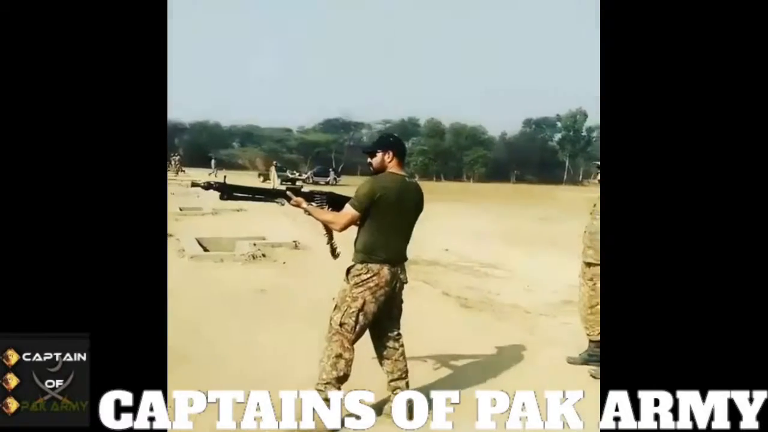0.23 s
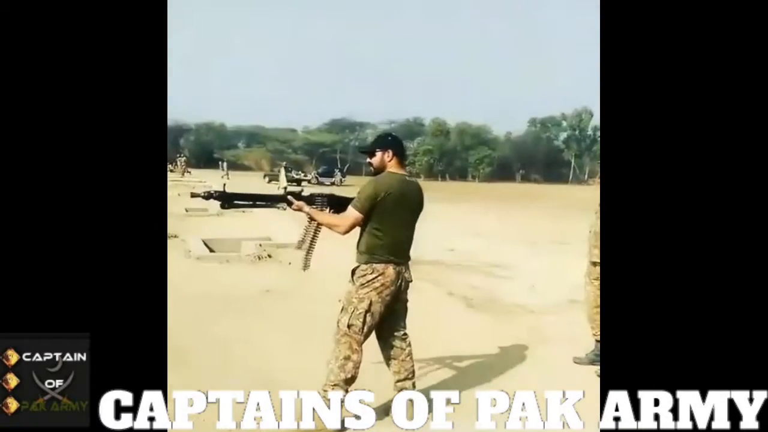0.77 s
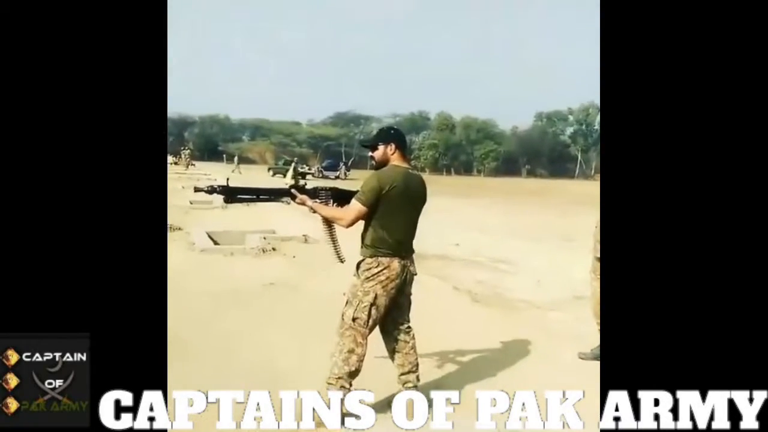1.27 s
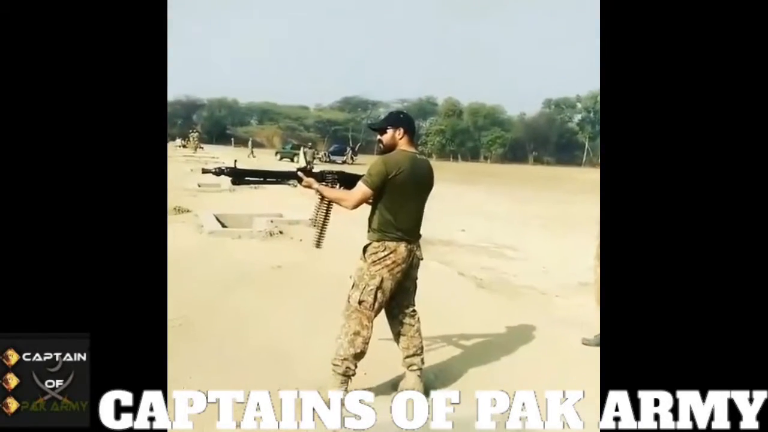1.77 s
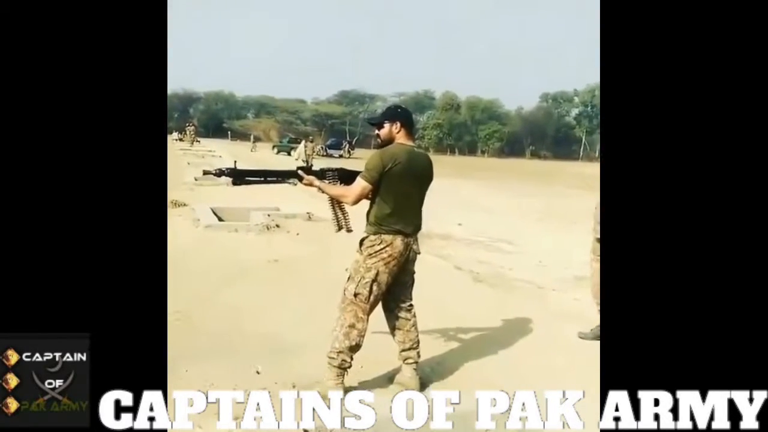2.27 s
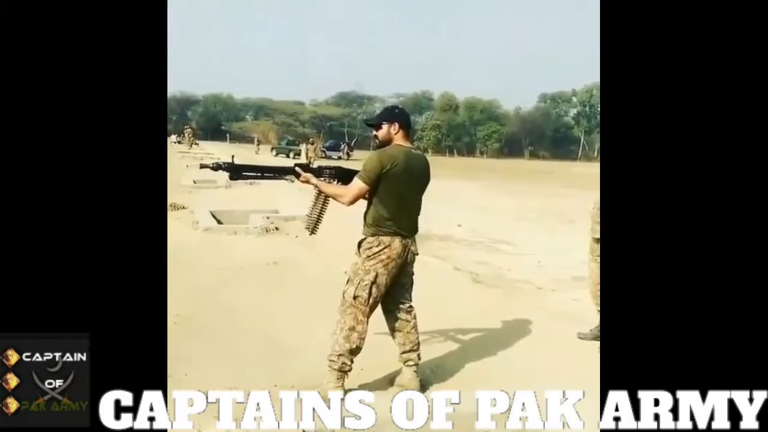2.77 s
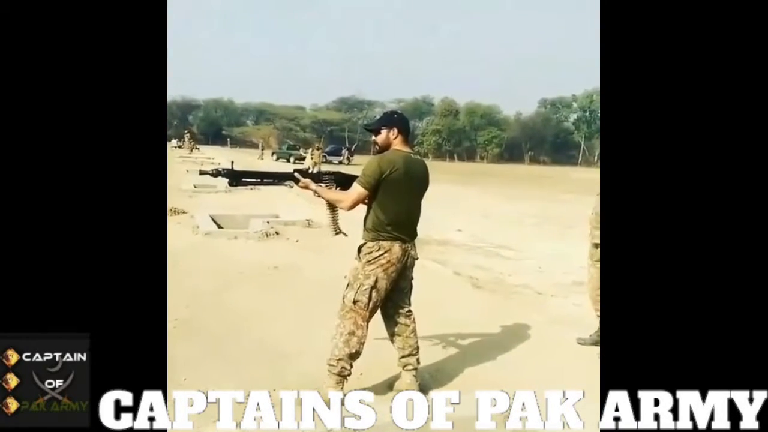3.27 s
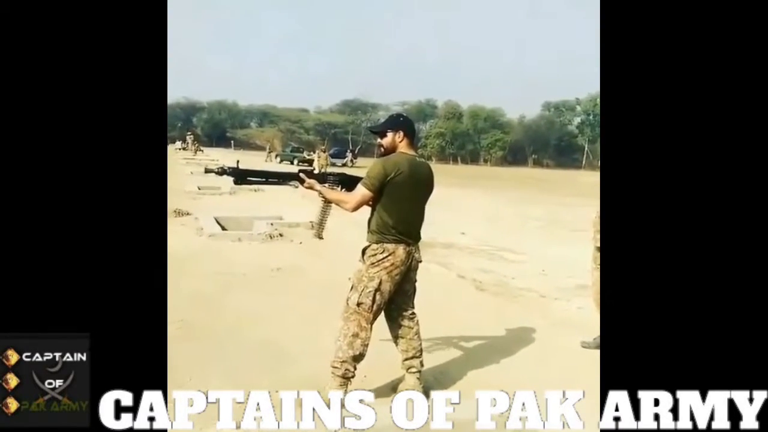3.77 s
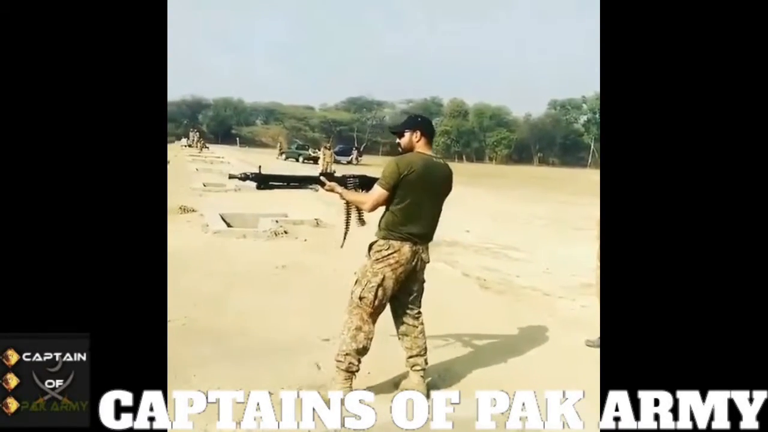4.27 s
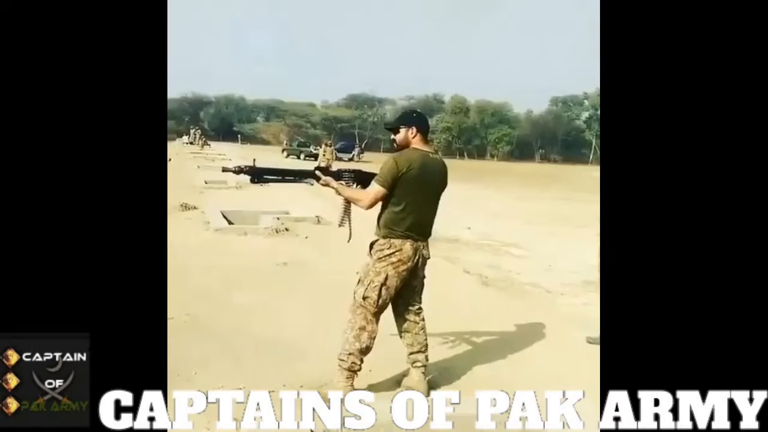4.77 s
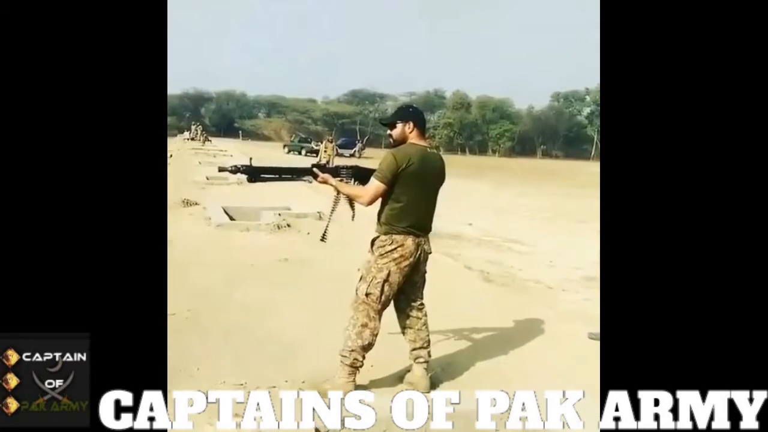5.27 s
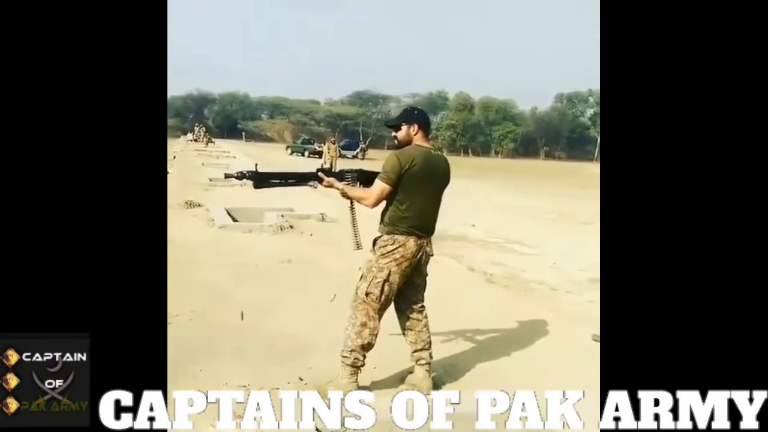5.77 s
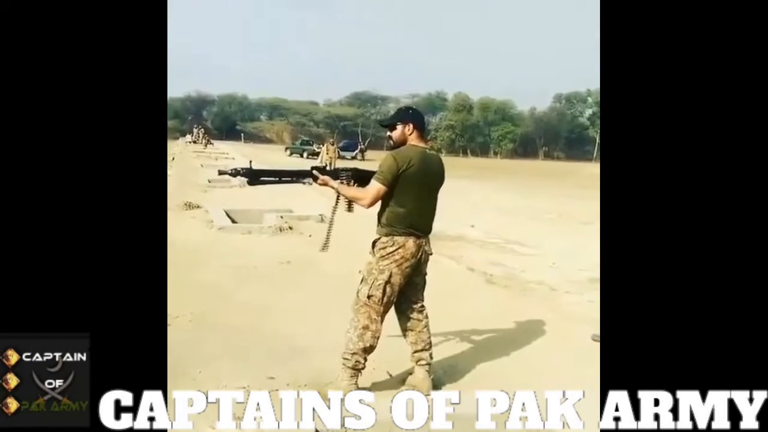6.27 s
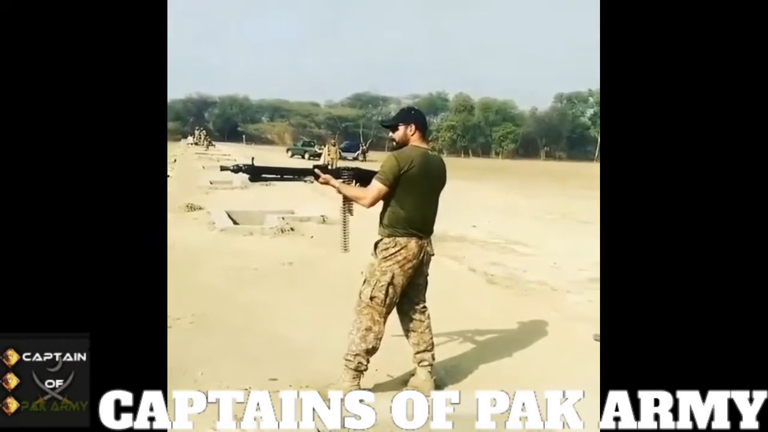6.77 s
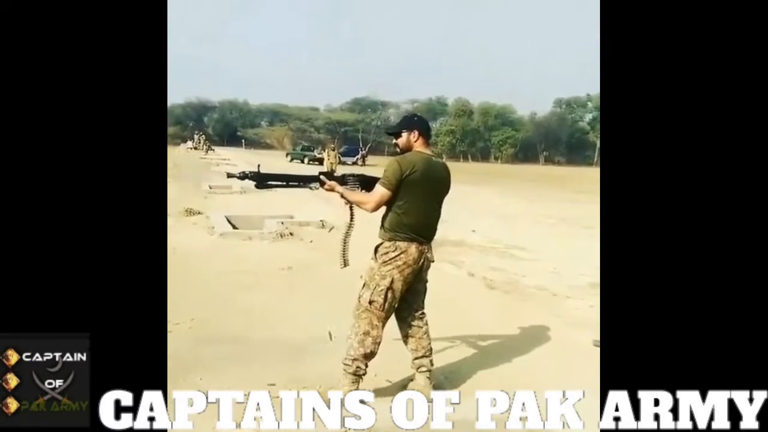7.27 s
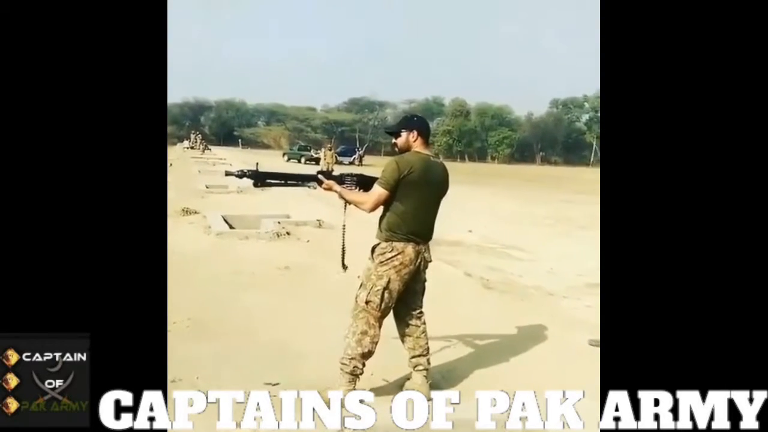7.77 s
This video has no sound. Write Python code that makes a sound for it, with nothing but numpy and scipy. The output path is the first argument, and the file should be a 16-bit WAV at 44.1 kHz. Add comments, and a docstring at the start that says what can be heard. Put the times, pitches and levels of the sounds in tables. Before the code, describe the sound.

A belt-fed machine gun fires five short bursts of three or four rounds, about two seconds apart, on an open range. Each burst is a ragged roar with a steel rattle, close enough to overload the microphone. Cases and links clink, and the shots roll back from the land with deep thuds. A few dull thumps sound far away over a faint low breeze.

```python
"""A belt-fed machine gun fires close bursts of three or four rounds on an open range.
Each shot is a ragged roar of gas; the bolt rattles forward before a burst, steel rings and cases clink
after it. Ground and trees roll the shots back, and an earth bank returns each as a deep thud.
Far off, a dove coos in the breeze and dull thumps roll in. The blasts overload the microphone,
and a limiter ducks after every loud peak."""
import sys
import numpy as np
from scipy import signal
from scipy.fft import rfft, irfft, next_fast_len
from scipy.io import wavfile
from scipy.ndimage import uniform_filter1d, minimum_filter1d, map_coordinates

SR = 44100
rng = np.random.default_rng(int(sys.argv[2]) if len(sys.argv) > 2 else 0)


def persist_wave(psi):
    """Save psi, clipped to +-1, as 16-bit WAV."""
    counts = np.round(np.clip(psi, -1, 1) * 32767).astype(np.int16)
    wavfile.write(sys.argv[1], SR, np.atleast_2d(counts).T)


N = 354123

# Rounds fired. Each row: time in seconds, relative blast level in dB, tilt of the round's own
# share of the roar in dB per octave, tree echo trim in dB.
SHOTS = [(-.1445, -10.5, -2, 4.5), (-.0928, -10, -13, 4), (-.0429, -16, -18, 1.5), (1.9940, -21, 0.5, 2.5),
         (2.0459, -9, 0.5, 1.5), (2.0985, -8.5, 0, 2), (4.0812, -20, -0.5, -0.5), (4.133, -8, 0, -0.5),
         (4.1817, -8.5, -0.5, 3.5), (4.2280, -8.5, -0.5, 4), (5.674, -10, 0, 0.5), (5.7283, -8.5, -1.5, 3),
         (5.7787, -7.5, 0, 2.5), (7.2326, -8, 0.5, 3), (7.2852, -8.5, -1, 0.5), (7.3354, -8.5, -1, 2),
         (7.384, -8.5, -1, 3.5)]
# Tone of the gun: muzzle gas, low boom, buffer knock, scraped or struck steel, sharp snap.
# Each row: frequency in Hz, relative level in dB.
BLAST_EQ = [(24, -29), (40, -4.5), (126, -8.5), (282, 4.5), (387, -4), (470, -0.5), (558, -6.5),
            (804, -4.5), (1630, -9), (1980, -5), (3830, -9), (4330, -11), (7200, -15), (8400, -22),
            (9200, -17), (10700, -19.5), (12400, -29), (13600, -61.5)]
BOOM_EQ = [(40, -20.5), (130, -3.5), (290, 2.5), (450, -2.5), (800, -23.5), (3000, -60)]
BUFFER_EQ = [(100, -21), (400, 0), (900, 3), (2200, -7), (3500, -13.5), (8000, -26), (13000, -49)]
STEEL_EQ = [(200, -27.5), (800, 6.5), (1500, -1.5), (3500, 5.5), (7000, -1), (11000, -1), (12800, -27),
            (14000, -58)]
SNAP_EQ = [(200, -6), (1000, -3), (2500, -1), (4500, -8), (7000, -12), (13000, -59)]
# Modes of the rattling gun body, and the barrel's beating pair.
# Each row: pitch in Hz, relative level in dB, 60 dB decay time (t60) in seconds.
BODY_MODES = [(446, -12, .08), (823, -8, .075), (1429, -17, 0.11), (1900, -12.5, 0.095), (2560, -19, 0.13),
              (3730, -19, .12), (3880, -16.5, 0.066), (4700, -18.5, 0.081), (5220, -21, 0.11),
              (5560, -21.5, .08), (6900, -24, .08)]
BARREL_MODES = [(7832, 3.5, 0.68), (7782, -6.5, 0.6)]
# The barrel's ring. Each entry: trim for one burst in dB.
BARREL_TRIMS_DB = [-31.5, -27, -21.5, -24, -24]
# Hard catches along the bolt's travel. Each row: seconds after release, relative level in dB.
BOLT_CATCHES = [(.003, -3), (.0135, 4), (.033, -1), (.043, 0.5), (0.056, 7.5)]
# Cases and links striking. Each row: start in seconds, relative level in dB, centre pitch in Hz,
# t60 in seconds.
CLINKS = [(.012, -25, 5030, 0.063), (.0325, -16.5, 4100, 0.035), (.110, -29, 6030, 0.077),
          (.321, -29.5, 6020, 0.19), (0.355, -24.5, 5760, 0.1), (.408, -27, 5640, 0.045),
          (1.583, -33, 4940, 0.0099), (2.311, -22, 4800, 0.022), (2.486, -28, 6200, 0.1),
          (2.535, -36, 6300, .08), (4.394, -23, 4600, .04), (4.450, -12.5, 5470, 0.032),
          (4.5775, -19, 2920, .03), (4.6322, -13.5, 5700, 0.038), (4.674, -22, 5700, 0.059),
          (5.088, -40, 5570, 0.026), (5.228, -47, 5370, 0.036), (5.856, -31, 7300, 0.062),
          (6.272, -32, 6800, 0.026), (7.460, -14.5, 2650, 0.016), (7.502, -27, 4870, 0.11),
          (7.732, -22, 6200, 0.043), (7.785, -31, 5630, 0.044), (7.827, -24, 5510, 0.0416)]
# One case left singing. Each row: start in seconds, level in dB, pitch in Hz, t60 in seconds.
BRASS_MODES = [(4.633, -42, 10760, 0.33), (4.633, -45, 10430, 0.43), (4.633, -41, 6315, 0.4)]
# Close snaps. Each row: start in seconds, then spike, rattle and thud levels in dB.
SNAPS = [(0.0554, 11.5, -3, -4), (4.5801, 3.5, -12, -28)]
# Open ground, belts of trees and rises in the land that scatter a shot back.
# Each row: round trip in seconds, relative level in dB, t60 in seconds.
FLATS = [(.1, -26, 0.23), (.3, -24.5, 1.2), (.55, -34.5, 1.15)]
WOODS = [(.19, -39.5, 1.1), (.51, -30, 1.9), (1.3, -49.5, 1.9)]
RIDGES = [(.32, -31, 4.9), (.68, -26, 1.19), (1.2, -45, 2.7)]
# Low mounds. Each row: round trip in seconds, relative level in dB.
MOUNDS = [(.170, -18), (.214, -19.5), (.274, -19), (0.3233, -10), (.357, -21), (.384, -24.5), (.445, -22),
          (.705, -17.5)]
# Tone of the echoes: ground, trees, ridges, hollow hum, mounds, the bank's thud and its splash.
# Each row: frequency in Hz, relative level in dB.
GROUND_EQ = [(40, -31), (120, -11), (200, 0.5), (300, -1), (430, -2), (600, -4.5), (850, -7), (1300, -11.5),
             (2500, -20), (4000, -25), (7000, -43), (10000, -57.5), (13000, -78.5)]
TREES_EQ = [(300, -20), (700, -11.5), (1300, -5), (1600, -1.5), (1950, 3.5), (2330, 0), (2700, -5.5),
            (3100, -5.5), (3600, -8.5), (4700, -17.5), (5900, -20.5), (7500, -27), (9500, -36),
            (11500, -51.5), (14000, -79.5)]
RIDGE_EQ = [(25, -26), (60, -13.5), (120, -3), (190, -1.5), (330, -0.5), (420, -10), (600, -21),
            (1200, -34.5), (4000, -74.5)]
HOLLOW_EQ = [(100, -34), (165, -22), (200, -6), (236, -21), (275, -12.5), (297, 4), (318, -10), (348, -10),
             (380, -22), (900, -44.5), (3000, -79.5)]
MOUND_EQ = [(50, -24.5), (150, -5), (320, 3.5), (600, -6), (900, -11.5), (1400, -14), (2200, -13),
            (4000, -30), (8000, -54), (13000, -80)]
BANK_EQ = [(30, -42.5), (70, -9), (130, -1), (210, 2), (300, -2.5), (450, -6.5), (560, -21.5), (680, -36),
           (950, -10.5), (1120, -28), (1400, -24), (2000, -30), (3200, -39), (6000, -61), (14000, -100)]
SPLASH_EQ = [(300, -15), (1000, -5), (2000, 1.5), (3000, -5), (4200, -17), (7000, -27.5), (11000, -39.5),
             (14000, -75)]
# The bank's treble splash. Each entry: level for one burst in dB.
SPLASH_LEVELS_DB = [-18, -19, -25, -18.5, -19]
# The slope's whoosh. Each row: distance from the band's centre in Hz, relative level in dB.
WHOOSH_BAND = [(1, 0), (35, -1), (65, -10), (120, -28), (400, -70)]
# Far thumps. Each row: start in seconds, peak in dB, low-mid tilt in dB per octave.
THUMPS = [(1.035, -22, -0.5), (1.124, -22, 3), (1.152, -20, 3), (1.183, -17.5, 0), (1.342, -27, 0),
          (1.728, -28, 0.5), (3.181, -18, -1.5), (3.193, -18, 0.5), (3.291, -17.5, -2.5),
          (3.625, -20.5, -4), (3.643, -20.5, -1), (3.671, -24.5, -4), (7.049, -14.5, 6), (7.082, -16, -2),
          (7.108, -22, 0)]
# The dove's call. Each row: start in seconds, length in seconds, level in dB, top pitch in Hz.
COOS = [(3.18, .11, -52, 690), (3.36, .17, -51, 725), (3.79, .13, -61.5, 705)]
# Swells and lulls of the breeze. Each row: centre in seconds, change in dB, half length in seconds.
GUSTS = [(1.01, 4.5, 0.19), (1.21, 7, .16), (1.517, -5, 0.1), (3.82, -2.5, .13), (3.3, 4.5, 0.3)]
# Tone of a dull thump, the breeze and the hiss. Each row: frequency in Hz, relative level in dB.
THUMP_EQ = [(30, -37), (70, -8.5), (130, 3.5), (250, -7), (500, -17.5), (900, -34.5), (2000, -80),
            (6000, -120)]
BREEZE_EQ = [(15, -41), (25, -23), (42, -6), (65, -1), (104, -1), (167, -3), (195, -4.5), (400, -22),
             (607, -29), (1300, -37.5), (2100, -37), (3000, -46.5), (4500, -58.5), (8000, -79)]
HISS_EQ = [(1000, 0), (4500, -0.5), (11300, -1.5), (13600, -12.5)]


def blasts(alike=0.32, hold_s=0.023, sag_db_per_s=151.5, collapse_t60=0.071, body_db=-1, drive_db=9.5):
    """Gas jets out, sags and collapses, shaking the gun's body; a boom and the bolt's knock follow."""
    out, t = np.zeros(N), clock(.2)
    common = noise(BLAST_EQ, len(t))  # same gun, same place: rounds are partly alike
    jet = amp(-sag_db_per_s * t) * decay(np.maximum(t - hold_s, 0), collapse_t60)
    wash = decay(t, 0.19, db=-7)  # a weak, duller return off the sand
    boom = amp(-8) * surge(t, peak_s=.011, rise_s=.04, t60=0.046)  # the gas ball swells and falls back
    recoil = amp(-9.5) * surge(t, peak_s=.035, rise_s=0.022, t60=0.043)  # the bolt hits its buffer
    for s, db, tilt_db, _ in SHOTS:
        roar = jet * blend(common, noise(BLAST_EQ, len(t), tilt_db), alike)
        roar += wash * noise(BLAST_EQ, len(t), tilt_db=-0.7)
        roar *= flutter(len(t), depth_db=2.5, rate=400)
        roar += boom * noise(BOOM_EQ, len(t))
        body = sum(decay(t, t60, level + rng.normal(0, 3.5)) * np.sin(2 * np.pi * (hz * t + rng.random()))
                   for hz, level, t60 in BODY_MODES)
        knock = recoil * noise(BUFFER_EQ, len(t))
        add(out, s, amp(db + drive_db) * attack(t, 0.00084) * (roar + amp(body_db) * body + knock))
    return out


def bolt(travel_s=.0645, level_db=-27, scrape_db=-11.5, grow_db_per_s=133, catch_t60=0.043):
    """Before each burst the bolt scrapes over hard catches, louder as it speeds up, and slams home."""
    out, t = np.zeros(N), clock(.11)
    slide = amp(scrape_db + grow_db_per_s * t) * (t < travel_s)
    slam = amp(8.5) * surge(t, peak_s=travel_s, rise_s=0.075, t60=0.11)
    stroke = amp(level_db) * np.maximum(slide, slam)
    for rounds in bursts():
        release = rounds[0] - travel_s
        add(out, release, stroke * flutter(len(t), depth_db=3, rate=320) * noise(STEEL_EQ, len(t)))
        for delay, db in BOLT_CATCHES:
            modes_hz = rng.uniform(2500, 8500, (14, 1))  # each catch rings other modes of the steel
            clack = unit(np.sin(2 * np.pi * modes_hz * t).sum(0))
            add(out, release + delay, decay(t, catch_t60, level_db + db) * attack(t, 0.00105) * clack)
    return out


def barrel_ring(delay_s=0.023, swell_s=0.16):
    """Two close, beating modes of the barrel sing out as each burst ends."""
    out, t = np.zeros(N), clock(.8)
    ring = sum(decay(t, t60, db) * np.sin(2 * np.pi * hz * t) for hz, db, t60 in BARREL_MODES)
    swell = 1 - np.exp(-(t / swell_s) ** 2)
    for rounds, db in zip(bursts(), BARREL_TRIMS_DB):
        add(out, rounds[-1] + delay_s, amp(db) * swell * flutter(len(t), depth_db=3, rate=55) * ring)
    return out


def cases(ring_db=-7, crack_db=-9, crack_t60=0.029, pitch_spread=.11):
    """Cases and belt links strike with a crack and a cluster of short modes; one case sings on."""
    out, t = np.zeros(N), clock(.35)
    for s, db, hz, t60 in CLINKS:
        modes_hz = hz * np.exp(pitch_spread * rng.standard_normal((12, 1)))
        partials = np.sin(2 * np.pi * (modes_hz * t + rng.random((12, 1))))
        ring = decay(t, t60, ring_db) * unit(partials.sum(0))
        crack = decay(t, crack_t60, crack_db) * noise(STEEL_EQ, len(t), tilt_db=-2)
        add(out, s, amp(db) * attack(t, 0.00053) * (ring + crack))
    for s, db, hz, t60 in BRASS_MODES:
        add(out, s, decay(t, t60, db) * np.sin(2 * np.pi * hz * t))
    return out


def snaps(rattle_t60=0.012):
    """Sharp snaps right up close: a hard spike with a small rattle and a thud under it."""
    out, t = np.zeros(N), clock(0.056)
    for s, spike_db, rattle_db, thud_db in SNAPS:
        add(out, s, amp(spike_db) * pulse(SNAP_EQ))
        add(out, s, decay(t, rattle_t60, rattle_db) * noise(SNAP_EQ, len(t)))
        add(out, s, -amp(thud_db) * pulse(THUMP_EQ))
    return out


def rolling_echo(absorb_db_per_khz_s=3.0, ground_alike=0.86):
    """Ground, trees and ridges scatter each shot back in lumps; the air takes treble along the way."""
    out, t = np.zeros(N), clock(2.2)
    pools = [noise(eq, N) for eq in (GROUND_EQ, TREES_EQ, RIDGE_EQ)]
    flats = echo_envelope(FLATS, t, rise_s=0.67)
    woods = echo_envelope(WOODS, t, rise_s=0.5)
    ridges = echo_envelope(RIDGES, t, rise_s=0.99)
    stones = rng.standard_normal(len(t)) * flutter(len(t), depth_db=3.5, rate=900)  # a few stand out
    terrain = unit(signal.fftconvolve(stones, pulse(GROUND_EQ))[:len(t)])
    hz, delay, _ = signal.stft(t, SR, nperseg=512)
    air = amp(-absorb_db_per_khz_s * np.outer(hz / 1000, delay - .5))  # bright before 0.5 s, dull after
    lumps = flutter(len(t), depth_db=2.5, rate=70)
    trunks = flutter(len(t), depth_db=3, rate=230)
    for s, _, _, trees_db in SHOTS:
        ground, trees, rumble = [pool[rng.integers(N - len(t)):][:len(t)] for pool in pools]
        ground = blend(terrain, ground, ground_alike)  # the ground repeats itself, moving leaves never do
        scatter = lumps * (flats * ground + ridges * rumble) + amp(trees_db) * trunks * woods * trees
        spectrum = signal.stft(scatter, nperseg=512)[2]
        add(out, s, signal.istft(spectrum * air, nperseg=512)[1])
    return out


def hollow_echo(level_db=-26.5):
    """The near ground hums one answer to all a burst's rounds, ringing at multiples of the firing rate."""
    out, t = np.zeros(N), clock(.8)
    swell = amp(level_db) * surge(t, peak_s=.2, rise_s=.55, t60=0.45)
    for rounds in bursts():
        answer = swell * noise(HOLLOW_EQ, len(t))
        for s in rounds:
            add(out, s, answer)
    return out


def slope_whoosh(level_db=-28.5, peak_s=.62, hz_at_peak=410, octaves_per_s=-1.9):
    """The long slope before the bank returns a narrow whoosh that sinks as it comes from farther off."""
    out, t = np.zeros(N), clock(1.3)
    centre_hz = hz_at_peak * 2 ** (octaves_per_s * (t - peak_s))
    phase = 2 * np.pi * np.cumsum(centre_hz) / SR
    swell = amp(level_db) * surge(t, peak_s, rise_s=.95, t60=.42)
    for s, *_ in SHOTS:
        band = noise(WHOOSH_BAND, len(t)) * np.sin(phase) + noise(WHOOSH_BAND, len(t)) * np.cos(phase)
        add(out, s, swell * band)
    return out


def mound_echoes(smear_t60=0.046, slap_db=1):
    """Low mounds each return a slap and a short smear, the same for every round."""
    out, t = np.zeros(N), clock(.1)
    slap = -amp(slap_db) * pulse(MOUND_EQ)
    for delay, db in MOUNDS:
        smear = decay(t, smear_t60) * attack(t, 0.0017) * noise(MOUND_EQ, len(t))
        for s, *_ in SHOTS:
            add(out, s + delay, amp(db) * slap)
            add(out, s + delay, amp(db) * smear)
    return out


def bank_echo(round_trip_s=.755, thud_db=0.7, second_lag_s=.0155, second_db=-15, splash_t60=0.046):
    """An earth bank 130 m off returns each round as a deep thud, with a weaker one just behind."""
    out, t = np.zeros(N), clock(.06)
    thud = -amp(thud_db) * pulse(BANK_EQ)
    for rounds, splash_db in zip(bursts(), SPLASH_LEVELS_DB):
        splash = decay(t, splash_t60, splash_db) * attack(t, 0.0024)  # its rough face smears the treble
        for s in rounds + round_trip_s:
            add(out, s, thud)
            add(out, s + second_lag_s, amp(second_db) * thud)
            add(out, s, splash * noise(SPLASH_EQ, len(t)))
    return out


def far_thumps(roll_db=-14, roll_t60=0.2):
    """Dull thumps from far away, each a low pulse with a short roll behind it."""
    out, t = np.zeros(N), clock(.3)
    for s, db, tilt_db in THUMPS:
        add(out, s, -amp(db) * pulse(THUMP_EQ, tilt_db=tilt_db))
        add(out, s, decay(t, roll_t60, db + roll_db) * attack(t, 0.0051) * noise(THUMP_EQ, len(t)))
    return out


def dove(pitch_sag=.1):
    """Three faint, pure coos, each arching in pitch."""
    out = np.zeros(N)
    for s, length, db, top_hz in COOS:
        arch = np.sin(np.pi * clock(length) / length)
        hz = top_hz * (1 - pitch_sag * (1 - arch))
        add(out, s, amp(db) * arch * np.sin(2 * np.pi * np.cumsum(hz) / SR))
    return out


def breeze(level_db=-38, hiss_db=-72.5, rustle_db=-51, rustle_s=1.2, rustle_half_s=.11):
    """A low, uneven breeze over a steady hiss; the strongest gust stirs the treetops."""
    t = np.arange(N) / SR
    strength_db = level_db + sum(db * np.exp(-((t - s) / half) ** 2) for s, db, half in GUSTS)
    wind = amp(strength_db) * flutter(N, depth_db=2.5, rate=7.2) * noise(BREEZE_EQ, N)
    hiss = amp(hiss_db) * noise(HISS_EQ, N)
    stir = amp(rustle_db) * np.exp(-((t - rustle_s) / rustle_half_s) ** 2)
    return wind + hiss + stir * noise(TREES_EQ, N, tilt_db=-5)


def bursts(pause_s=.5):
    """Times of the rounds, grouped into bursts at the pauses."""
    times = np.array([s for s, *_ in SHOTS])
    return np.split(times, np.flatnonzero(np.diff(times) > pause_s) + 1)


def amp(db):
    """Decibels to gain."""
    return 10 ** (np.asarray(db) / 20)


def unit(x):
    """Scale to rms 1."""
    return x / np.sqrt(np.mean(x ** 2) + 1e-20)


def clock(seconds):
    """Sample times of a stretch."""
    return np.arange(int(seconds * SR)) / SR


def attack(t, seconds):
    """A fade-in with this time constant."""
    return 1 - np.exp(-t / seconds)


def decay(t, t60, db=0):
    """A gain that starts at db and falls 60 dB every t60 seconds."""
    return amp(db - 60 * t / t60)


def surge(t, peak_s, rise_s, t60):
    """A gain that builds by 60 dB in rise_s, peaks at 1 and dies away."""
    return amp(-60 * np.maximum((peak_s - t) / rise_s, (t - peak_s) / t60))


def echo_envelope(places, t, rise_s):
    """Gain of the echo from several places, added in power."""
    return np.sqrt(sum((amp(db) * surge(t, s, rise_s, t60)) ** 2 for s, db, t60 in places))


def flutter(size, depth_db, rate):
    """A random gain that changes rate times a second."""
    knots = rng.standard_normal(int(size * rate / SR) + 4)
    return unit(amp(depth_db * map_coordinates(knots, [np.arange(size) * rate / SR])))


def blend(common, fresh, share):
    """Equal-power mix with this share of the common sound."""
    return np.sqrt(share) * common + np.sqrt(1 - share) * fresh


def colour(eq, hz):
    """Gain of an EQ curve, interpolated on a log frequency axis."""
    points_hz, db = np.transpose(eq)
    return amp(np.interp(np.log(hz + 1), np.log(points_hz + 1), db))


def noise(eq, size, tilt_db=0):
    """Coloured noise of rms 1, tilted per octave."""
    padded = next_fast_len(size)
    hz = np.fft.rfftfreq(padded, 1 / SR)
    gain = colour(eq, hz) * amp(tilt_db * np.log2(1 + hz / 500))
    return unit(irfft(rfft(rng.standard_normal(padded)) * gain, padded)[:size])


def pulse(eq, size=4096, tilt_db=0):
    """A pressure pulse of peak 1 with this tone, tilted per octave from 100 to 1000 Hz."""
    hz = np.fft.rfftfreq(size, 1 / SR)
    gain = colour(eq, hz) * amp(tilt_db * np.log2(np.clip(hz, 100, 1000)))
    cepstrum = irfft(np.log(gain))
    cepstrum[1:size // 2] *= 2  # minimum phase puts the punch at the front
    cepstrum[size // 2 + 1:] = 0
    wave = irfft(np.exp(rfft(cepstrum)))
    return wave / np.abs(wave).max()


def add(track, s, sound):
    """Mix a sound in at s seconds."""
    start = round(s * SR)
    part = sound[max(-start, 0):max(N - start, 0)]
    track[max(start, 0):][:len(part)] += part


def saturate(x, top_db):
    """Round off the peaks at a top level."""
    return x / (1 + np.abs(x / amp(top_db)) ** 6) ** (1 / 6)


def scene():
    """The gun, its echoes and the open range, in mono."""
    gun = blasts() + bolt() + barrel_ring() + cases() + snaps()
    echoes = rolling_echo() + hollow_echo() + slope_whoosh() + mound_echoes() + bank_echo()
    return (gun + echoes + breeze() + far_thumps() + dove())[None]


def record(dry, overload_db=6.5, limit_db=-1.36, ceiling_db=-3.5, top_hz=13200):
    """The microphone overloads, a limiter ducks at the peaks, then a soft clip and a steep treble cut."""
    overloaded = saturate(dry, overload_db)
    needed = np.minimum(1, amp(limit_db) / (np.abs(overloaded) + 1e-9))
    held = minimum_filter1d(needed, size=2100, origin=950)  # stays down for 45 ms after a peak
    gain = uniform_filter1d(held, size=130)
    limited = saturate(overloaded * gain, ceiling_db)
    hz = np.fft.rfftfreq(N, 1 / SR)
    return irfft(rfft(limited) / np.sqrt(1 + (hz / top_hz) ** 60), N)


dry = scene()
out = record(dry)
persist_wave(out)
```